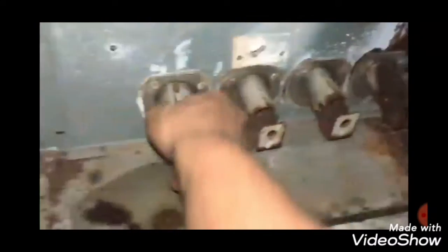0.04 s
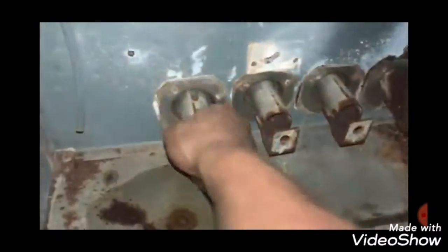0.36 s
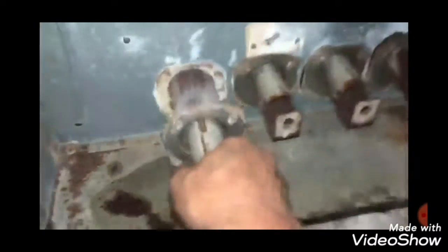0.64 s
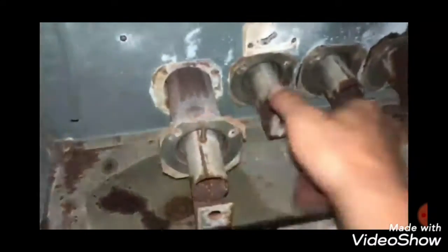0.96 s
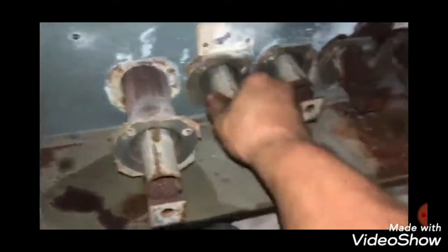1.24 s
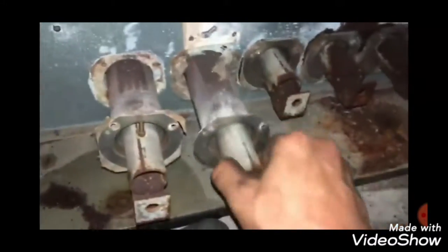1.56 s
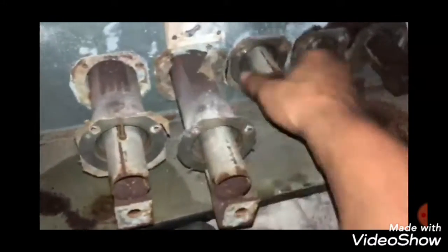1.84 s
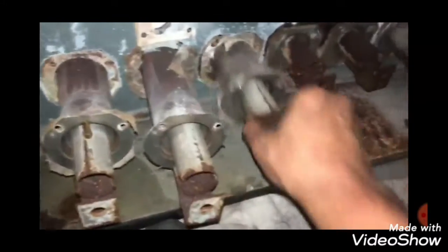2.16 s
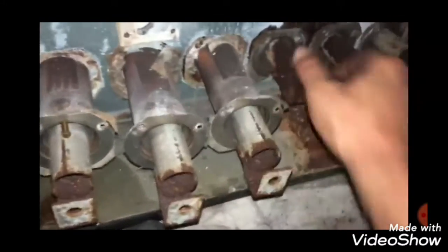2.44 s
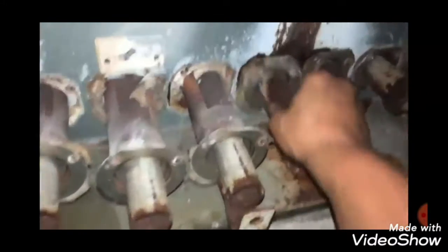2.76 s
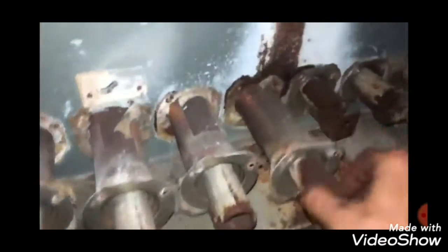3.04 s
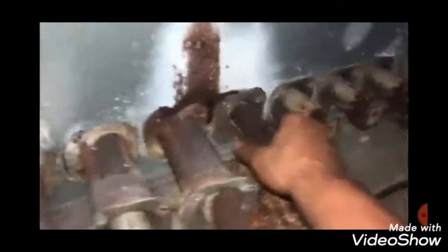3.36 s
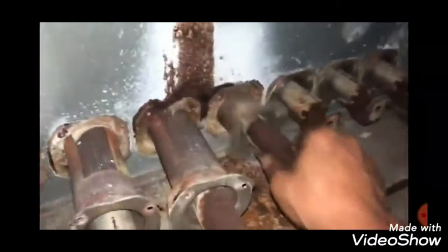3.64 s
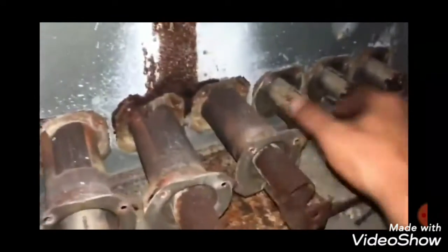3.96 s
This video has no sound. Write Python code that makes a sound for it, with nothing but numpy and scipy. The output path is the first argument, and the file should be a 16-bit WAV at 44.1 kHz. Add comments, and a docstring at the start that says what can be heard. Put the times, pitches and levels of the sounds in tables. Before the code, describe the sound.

Rusty steel tubes scrape out of a sheet-metal wall, close by. The first squeals and cuts to a brief silence; more follow in gritty, ringing bursts with knocks, squeaks and soft thuds, over a rushing workshop hiss.

```python
"""A rusty steel tube squeals and grinds out of a sheet-metal furnace wall, close by; then all sound drops
briefly into a short silence. More tubes follow and grind through their collars, most with short jerks and
knocks; rust grains ring the tube and the hollow wall. Stick and slip add squeaks, and the wall thuds under hard
pulls. Behind them a workshop rushes, with a faint sagging drone and a thin whine, probably from power tools."""
import sys
import numpy as np
from scipy import signal
from scipy.fft import rfft, irfft, next_fast_len
from scipy.io import wavfile
from scipy.ndimage import uniform_filter1d, minimum_filter1d, map_coordinates

SR = 44100
rng = np.random.default_rng(int(sys.argv[2]) if len(sys.argv) > 2 else 0)


def generate_wav(sig):
    """Save sig (samples, or channels by samples) to the path in sys.argv[1] as 16-bit PCM at SR."""
    pcm = np.round(np.clip(np.atleast_2d(sig).T, -1, 1) * 32767).astype(np.int16)
    wavfile.write(sys.argv[1], SR, pcm)


N = 176400

# long grinding pulls (start [s], rise [s], hold [s], fall per 20 dB [s], level [dB],
# wall send [dB], ring send [dB], ring pitch [Hz])
TUBE_DRAGS = [(-.02, 0.0073, 0.27, 0.075, -14, -20, -14.5, 2975),
              (0.723, 0.024, 0.0089, 0.054, -25.5, 4, -9, 3040),
              (0.805, 0.0033, 0.096, 0.13, -36, -0.5, 1, 3130),
              (0.928, 0.0061, 0.04, 0.036, -29.5, -11, -7.5, 3250),
              (0.992, 0.071, 0.024, 0.06, -33.5, -5.5, -4, 3150),
              (1.698, 0.0025, 0.065, 0.25, -24, -2.5, -25, 3200),
              (1.775, 0.021, 0.029, 0.14, -17, -4, -14, 3090),
              (1.934, 0.011, .004, 0.025, -19, -21, -32, 3320),
              (2.075, 0.016, 0.027, 0.28, -47.5, -17, 17.5, 2970),
              (2.315, 0.023, 0.023, 0.076, -30.5, 2, -2, 3000),
              (2.388, 0.015, 0.012, 0.15, -23, -17, 0, 2970),
              (2.439, 0.035, 0.059, 0.16, -18.5, -12, -2.5, 3100),
              (3.024, 0.018, 0.027, 0.088, -30, -7, 0, 2930),
              (3.114, 0.0023, 0.015, 0.1, -18.5, -6, -17, 3000),
              (3.161, 0.013, 0.047, 0.082, -14.5, -15, -9, 3020),
              (3.227, 0.017, 0.1, 0.053, -16.5, -22, -9, 3120),
              (3.32, 0.022, 0.044, 0.026, -21.5, -12.5, -14, 3120),
              (3.816, 0.034, 0.17, .1, -31.5, 4.5, -1, 2940),
              (3.909, 0.025, 0.022, 0.085, -26, 2, -1, 2950), (3.968, 0.012, .04, .1, -15.5, -27, -2, 2920)]
# jerks and knocks in the collar (time [s], level [dB], wall send [dB], ring send [dB])
COLLAR_CATCHES = [(0.681, -26, -3, -4), (0.804, -35, -14, 8), (1.003, -30.5, 1.5, -3), (1.099, -32, -19, 4),
                  (1.604, -33, 6.5, 6), (1.671, -24.5, -19, -11), (1.708, -22.5, 1.5, 10),
                  (1.716, -26, 0, 2), (1.772, -12.5, -7, -2), (1.826, -30, -11, 7),
                  (2.347, -29.5, -16, 10.5), (2.396, -13.5, -12.5, -8), (2.468, -30, -12, 3),
                  (2.576, -25, -2, -5.5), (3.073, -29.5, 7.5, -25), (3.116, -17.5, -7, -12),
                  (3.166, -21, -12, -26)]
CATCH_RISE_S, CATCH_HOLD_S, CATCH_FALL_S = 0.00033, 0.0051, 0.015
def tubes():
    """Long drags and short catches excite the same metal; a catch rings like the nearest drag."""
    out = np.zeros(N)
    for start, rise, hold, fall, db, *colour in TUBE_DRAGS:
        add(out, start, amp(db) * scrape(rise, hold, fall, *colour, size=28000))
    for start, db, *sends in COLLAR_CATCHES:
        ring_hz = min(TUBE_DRAGS, key=lambda drag: abs(drag[0] - start))[-1]
        knock = scrape(CATCH_RISE_S, CATCH_HOLD_S, CATCH_FALL_S, *sends, ring_hz, size=5000)
        add(out, start, amp(db) * knock)
    return out


# crunch of crumbling rust (frequency [Hz], level [dB])
RUST_EQ = [(100, -22), (450, -32), (850, -3.5), (1700, -2), (2600, 0.5), (4000, -2.5), (5500, -1),
           (7200, -3), (8300, -6.5), (10000, -12), (11800, -3), (13000, -27)]
# steel colour shared by all tubes and collars (frequency [Hz], width [Hz], level [dB])
TUBE_MODES = [(1645, 80, 4.5), (2075, 110, 6), (3700, 48, -2), (5080, 30, -7.5), (6600, 82, 1)]
# hollow body of the wall (frequency [Hz], width [Hz], level [dB])
WALL_MODES = [(433, 28, -7), (538, 49, -6.5), (673, 68, -2), (780, 96, -5), (892, 53, 1.5), (1000, 33, 0.5),
              (1540, 52, -2)]
# a tube's metallic ring near 3 kHz, pitched a little differently from pull to pull
# (ratio to ring pitch [x], width [Hz], level [dB])
RING_MODES = [(0.683, 70, -9), (1.002, 118, 11), (1.16, 110, -4), (1.36, 69.6, -6.5), (1.53, 65, -6),
              (1.83, 85, -10)]
# how well the metal radiates (frequency [Hz], gain [dB])
RADIATION_EQ = [(60, -28), (300, -2), (7500, 0.5), (10000, -10.5), (12000, -19.5), (15000, -20)]
GRAINS_PER_S, GRAIN_SPREAD_DB, GRAIN_DB, TUBE_SEND_DB = 1200, 7, -3, -10
JUDDER_HZ, JUDDER_DB, LURCH_HZ, LURCH_DB = 172, 0.25, 90, 1.4
def scrape(rise, hold, fall, wall_db, ring_db, ring_hz, size):
    """A lurching, juddering contact sheds rust grains, heard directly and through tube and wall."""
    hits = rng.random(size) < GRAINS_PER_S / SR
    strength = amp(GRAIN_SPREAD_DB * np.clip(rng.standard_normal(size), -2, 2))
    grains = hits * strength * rng.choice([-1, 1], size)
    rubbing = patchy_noise(3.5, size, window=1024)
    pressure_db = JUDDER_DB * wobble(JUDDER_HZ, size) + LURCH_DB * wobble(LURCH_HZ, size)
    force = envelope(np.arange(size) / SR, rise, hold, fall)
    friction = (rubbing + amp(GRAIN_DB) * unit(grains)) * amp(pressure_db) * force
    ring = contact_modes([(ratio * ring_hz, width, db) for ratio, width, db in RING_MODES])
    paths = [(0, eq(RUST_EQ)), (TUBE_SEND_DB, contact_modes(TUBE_MODES)),
             (wall_db, contact_modes(WALL_MODES)), (ring_db, ring)]
    body = sum(amp(db) * unit(filtered(friction, path)) for db, path in paths)
    return np.sqrt(np.mean(force ** 2)) * filtered(body, eq(RADIATION_EQ))


def contact_modes(modes, spread_db=3):
    """A resonator bank with a random balance: each point of contact favours other modes."""
    bank = [(hz, width, amp(db + spread_db * rng.uniform(-0.88, 1))) for hz, width, db in modes]
    return lambda f: sum(gain * 1j * f * width / (hz * hz - f * f + 1j * f * width)
                         for hz, width, gain in bank)


# falling squeal of the first pull (time [s], pitch [Hz], level [dB])
SQUEAL_GLIDE = [(0, 6250, -21), (.048, 6190, -17.5), (.074, 6220, -27), (.095, 6240, -21.5),
                (.143, 6120, -16.5), (.176, 6160, -50), (.205, 6170, -20), (.24, 6040, -23),
                (.262, 5440, -22), (.278, 5230, -23.5), (.29, 4500, -18), (.3, 4390, -26), (.33, 4200, -61)]
def squeal():
    """The first tube sings in its collar, high and then diving."""
    return glide(SQUEAL_GLIDE)


# short squeaks and groans (start [s], hold [s], pitch [Hz], level [dB])
MODE_SQUEAKS = [(0, 0.069, 3880, -23.5), (1.075, 0.028, 5060, -36.5), (1.814, 0.016, 7800, -33),
                (2.45, 0.11, 3005, -20.5), (3.239, 0.038, 3060, -18.5), (3.288, 0.031, 1660, -22.5),
                (3.341, 0.043, 997, -23)]
def squeaks(jitter_hz=36):
    """Stick and slip lock on to one mode for a moment: a rough, pitched screech."""
    out = np.zeros(N)
    t = np.arange(SR // 4) / SR
    for start, hold, hz, db in MODE_SQUEAKS:
        screech = trembling_sine(hz, jitter_hz / hz, rate=260, size=len(t))
        screech *= amp(2.5 * wobble(160, len(t)))
        add(out, start, amp(db) * envelope(t, rise=0.0078, hold=hold, fall=0.019) * screech)
    return out


# bursts of top-end sizzle (start [s], hold [s], level [dB])
RUST_SIZZLES = [(0, 0.23, -34), (3.18, .19, -37)]
def sizzle():
    """Fine rust adds a very high, fluttering hiss to the hardest pulls."""
    t = np.arange(N) / SR
    hiss = unit(filtered(rng.standard_normal(N), lambda hz: hz > 10500))
    level = sum(amp(db) * envelope(t - start, CATCH_RISE_S, hold, CATCH_FALL_S)
                for start, hold, db in RUST_SIZZLES)
    return hiss * amp(3.7 * wobble(LURCH_HZ)) * level


# dull thuds under the hardest pulling (start [s], hold [s], level [dB])
WALL_BUMPS = [(0, 0.03, -41.5), (0.103, 0.033, -40.5), (1.76, 0.037, -56), (2.506, 0.017, -50),
              (3.123, 0.11, -40.5), (3.967, .03, -48)]
# their low-end weight (frequency [Hz], level [dB])
BUMP_EQ = [(20, -20), (45, 11), (220, 0), (400, -14), (1000, -79)]
def wall_bumps():
    """The wall flexes and thuds softly."""
    t = np.arange(N) / SR
    level = sum(amp(db) * envelope(t - start, rise=0.029, hold=hold, fall=0.054)
                for start, hold, db in WALL_BUMPS)
    return rush(BUMP_EQ, patchy_db=4) * level


# short reverb, darkening as it dies (frequency [Hz], time to fall 60 dB [s])
ROOM_DECAY = [(200, 0.36), (2000, 0.28), (10000, 0.15)]
ROOM_SEND_DB = -9
def room(x):
    """Each frequency of the room's answer dies at its own speed."""
    hz, t, spectrum = signal.stft(rng.standard_normal(SR // 2), SR, nperseg=256)
    decay = amp(-60 * t / along(ROOM_DECAY, hz)[:, None])
    tail = signal.istft(spectrum * decay, SR, nperseg=256)[1]
    return signal.fftconvolve(x, tail / np.linalg.norm(tail))[:N]


# fader rides of the workshop bed (time [s], hiss [dB], low mids [dB], 2 kHz band [dB])
SHOP_FADERS = [(0.368, -39, -48, -54), (.5, -35.5, -43, -38.5), (.68, -34, -44.5, -81),
               (.88, -29.5, -49, -56), (1.15, -32, -42.5, -33), (1.36, -35.5, -37, -40.5),
               (1.55, -31, -36, -29), (1.75, -24.5, -37.5, -35.5), (2.02, -28.5, -36, -40),
               (2.159, -27.5, -33, -28.5), (2.3, -27, -32, -38), (2.7, -27, -31, -26),
               (2.82, -29, -30, -29), (2.949, -28.5, -29.5, -41.5), (3.1, -28.5, -31, -24),
               (3.5, -28.5, -31, -36), (3.8, -29, -31, -36), (4, -33, -33, -38)]
# broad, bright hiss (frequency [Hz], level [dB])
HISS_EQ = [(50, -39.5), (300, -12.5), (700, -7), (1600, -3), (2500, -1.5), (3150, 5), (3650, -0.5),
           (4100, -5.5), (5000, -4.5), (5900, -9), (6900, -5), (8000, -14.5), (9200, -26.5), (11000, -80)]
# body of the bed (frequency [Hz], level [dB])
LOW_MID_EQ = [(40, -41), (200, -19), (400, -5), (650, 0), (1100, 1.5), (1550, 5), (2200, -17), (9000, -63)]
# its bite around 2 kHz (frequency [Hz], level [dB])
BITE_EQ = [(1200, -47), (1700, -0.5), (2200, 4.5), (3600, -12.5), (9000, -59)]
def workshop():
    """Machinery rushes in three noise bands that swell separately."""
    bands = zip(curves(SHOP_FADERS), (HISS_EQ, LOW_MID_EQ, BITE_EQ))
    return sum(amp(db) * rush(band_eq, patchy_db=3.3) for db, band_eq in bands)


# distant sagging notes (start [s], length [s], first pitch [Hz], last pitch [Hz], level [dB])
DRONE_NOTES = [(1.25, 0.56, 252.3, 193.8, -52.5), (2.045, 0.76, 225.3, 205.7, -49),
               (2.74, 0.315, 234.6, 190.6, -52)]
DRONE_SAG, DRONE_OCTAVE_DB = 1.94, -0.5
def drone():
    """A far machine's note and its octave swell and sag in pitch."""
    out = np.zeros(N)
    for start, length, first_hz, last_hz, db in DRONE_NOTES:
        progress = np.minimum(np.arange(SR) / SR / length, 1)
        hz = last_hz + (first_hz - last_hz) * np.exp(-DRONE_SAG * progress) * (1 - progress)
        phase = 2 * np.pi * np.cumsum(hz * (1 + .01 * wobble(30, SR))) / SR
        note = np.sqrt(2) * (np.sin(phase) + amp(DRONE_OCTAVE_DB) * np.sin(2 * phase))
        swell = np.sin(np.pi * np.sqrt(progress))
        add(out, start, amp(db + 3.8 * wobble(33.5, SR)) * swell * note)
    return out


# thin whine near the end (time [s], pitch [Hz], level [dB])
WHINE_GLIDE = [(3.3, 3820, -55), (3.45, 3765, -38), (3.62, 3720, -35.5), (3.76, 3710, -37),
               (3.9, 3630, -44)]
def whine():
    """A high note, probably a power tool, swells and droops slightly."""
    return glide(WHINE_GLIDE)


def amp(db):
    """Decibels as a gain."""
    return 10 ** (np.asarray(db) / 20)


def unit(x):
    """x scaled to rms 1."""
    return x / np.sqrt(np.mean(x ** 2) + 1e-20)


def along(points, hz):
    """Read (frequency, value) points on a log axis."""
    freqs, values = np.transpose(points)
    return np.interp(np.log(hz + 1), np.log(freqs + 1), values)


def eq(points):
    """The response through (frequency [Hz], gain [dB]) points."""
    return lambda hz: amp(along(points, hz))


def curves(rows):
    """One value per sample for each column after the time."""
    times, *columns = np.transpose(rows)
    return [np.interp(np.arange(N) / SR, times, column) for column in columns]


def wobble(rate, size=N):
    """A smooth random curve, rate knots a second."""
    knots = rng.standard_normal(size // 8 + 8)
    return map_coordinates(knots, [np.arange(size) * rate / SR], mode="mirror")


def filtered(x, response):
    """x through a complex frequency response."""
    padded = next_fast_len(len(x) + 8192)
    return irfft(rfft(x, padded) * response(np.fft.rfftfreq(padded, 1 / SR)), padded)[:len(x)]


def patchy_noise(patchy_db, size, window):
    """White noise in which narrow bands swell and fade; a longer window makes them narrower and slower."""
    spectrum = signal.stft(rng.standard_normal(size), nperseg=window)[2]
    patches = uniform_filter1d(rng.standard_normal(spectrum.shape), 3, axis=0)
    patches = uniform_filter1d(patches, 6, axis=1)
    spectrum *= amp(patchy_db * np.clip(unit(patches), -2, 2))
    return unit(signal.istft(spectrum, nperseg=window)[1][:size])


def rush(points, patchy_db):
    """Coloured, patchy noise of rms 1."""
    return unit(filtered(patchy_noise(patchy_db, N, window=2048), eq(points)))


def trembling_sine(hz, jitter, rate, size=N):
    """A sine of rms 1 whose pitch trembles by the fraction jitter."""
    pitch = hz * (1 + jitter * wobble(rate, size))
    return np.sqrt(2) * np.sin(2 * np.pi * np.cumsum(pitch) / SR)


def glide(rows):
    """A thin, slightly unsteady gliding tone, silent outside its rows."""
    hz, db = curves(rows)
    t = np.arange(N) / SR
    tone = trembling_sine(hz, jitter=.0028, rate=300) * amp(1.5 * wobble(120))
    return tone * amp(db) * (t >= rows[0][0]) * (t < rows[-1][0])


def envelope(t, rise, hold, fall):
    """Rise, hold, then 20 dB down in each fall time."""
    return np.clip(t / rise, 0, 1) * amp(-20 * np.maximum(t - rise - hold, 0) / fall)


def add(track, start, x):
    """Mix x into the track from start seconds."""
    i = round(start * SR)
    x = x[max(-i, 0):N - i]
    track[max(i, 0):][:len(x)] += x


def scene():
    """The close metal and its reverb over the wall's thuds and the workshop bed, in mono."""
    near = tubes() + squeaks() + squeal() + sizzle()
    return (near + amp(ROOM_SEND_DB) * room(near) + wall_bumps() + workshop() + drone() + whine())[None]


# roll-off of the top octave (frequency [Hz], gain [dB])
TOP_EQ = [(12200, 0), (13000, -5), (15800, -10)]
FADE_AT_S, RESUME_AT_S, FADE_DB_PER_S, GAP_FLOOR_DB = 0.303, 0.3653, 1094, -42
CEILING, LIMITER_S, TOP_CUT_HZ = .7, .004, 15800
def record(dry):
    """The sound fades out briefly and cuts back in; a limiter holds the peaks and the top is cut."""
    t = np.arange(N) / SR
    fade_db = np.clip(-FADE_DB_PER_S * (t - FADE_AT_S), GAP_FLOOR_DB, 0)
    x = dry[0] * amp(np.where(t < RESUME_AT_S, fade_db, 0))
    span = round(LIMITER_S * SR)
    peak_gain = CEILING / np.maximum(abs(x), CEILING)
    x = x * uniform_filter1d(minimum_filter1d(peak_gain, span), span)
    return filtered(x, lambda hz: eq(TOP_EQ)(hz) * (hz < TOP_CUT_HZ))[None]


dry = scene()
out = record(dry)
generate_wav(out)
```